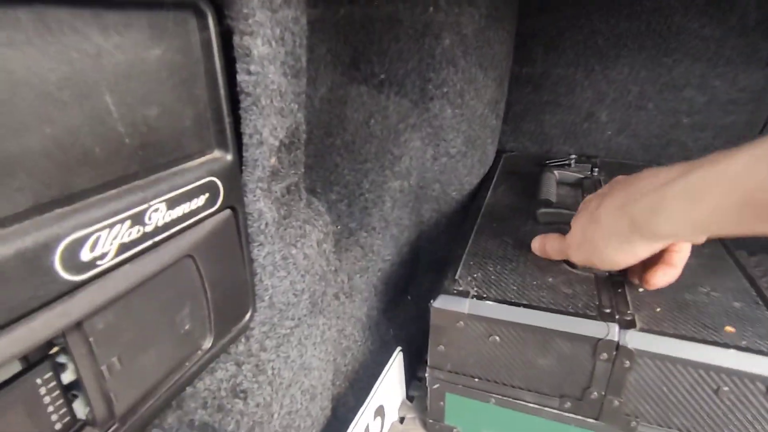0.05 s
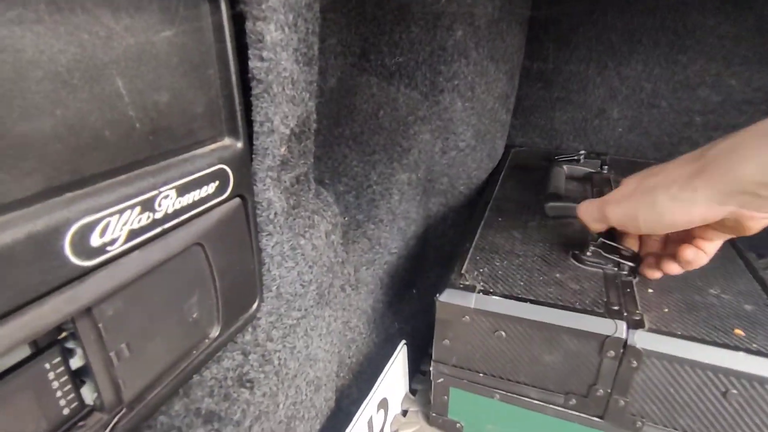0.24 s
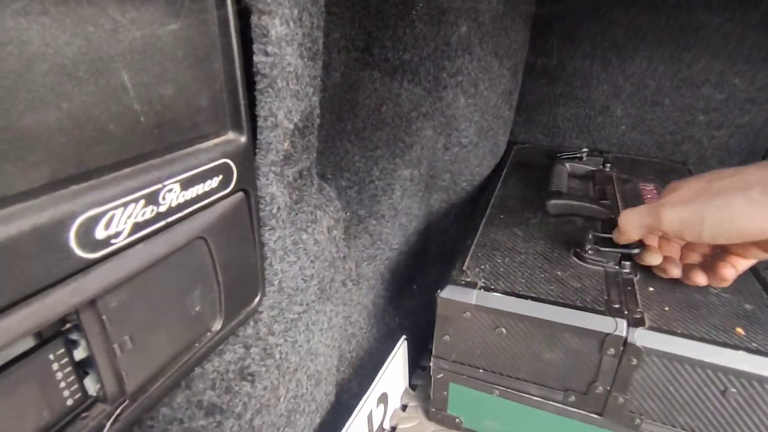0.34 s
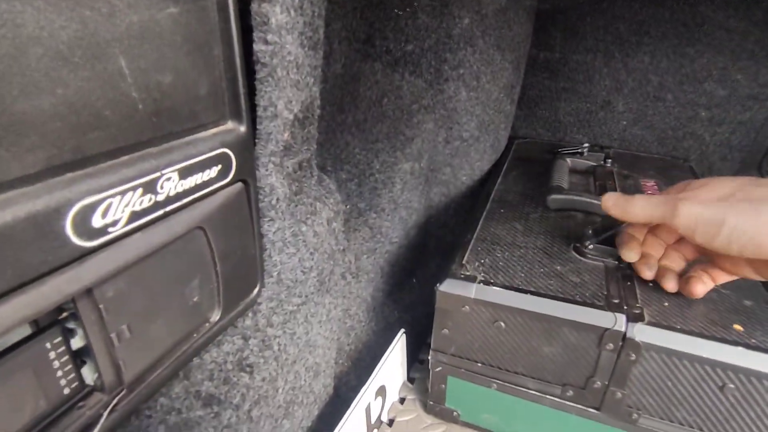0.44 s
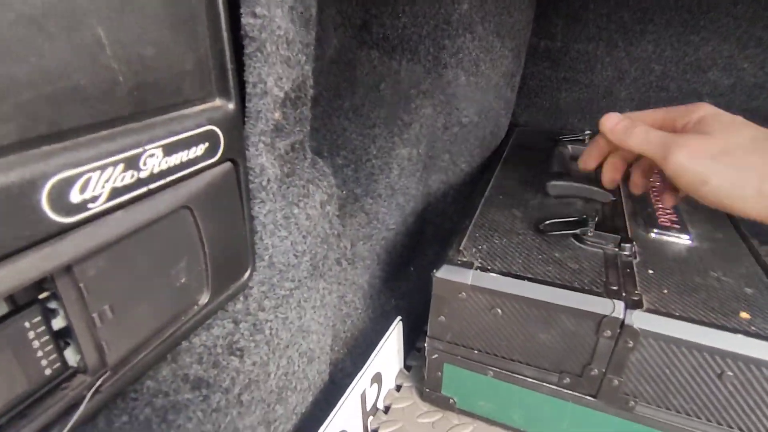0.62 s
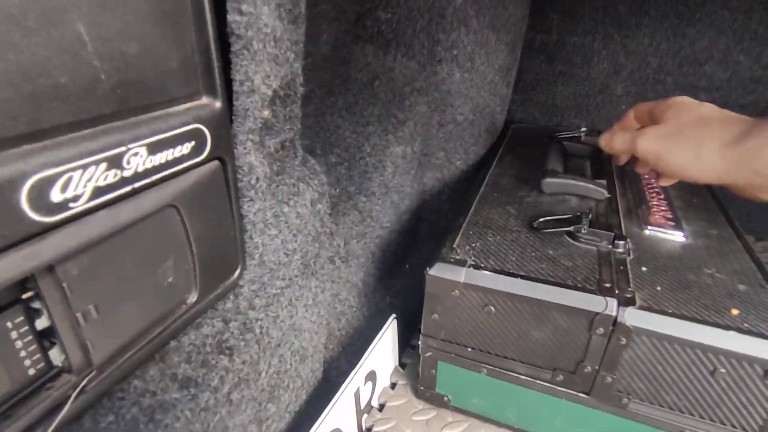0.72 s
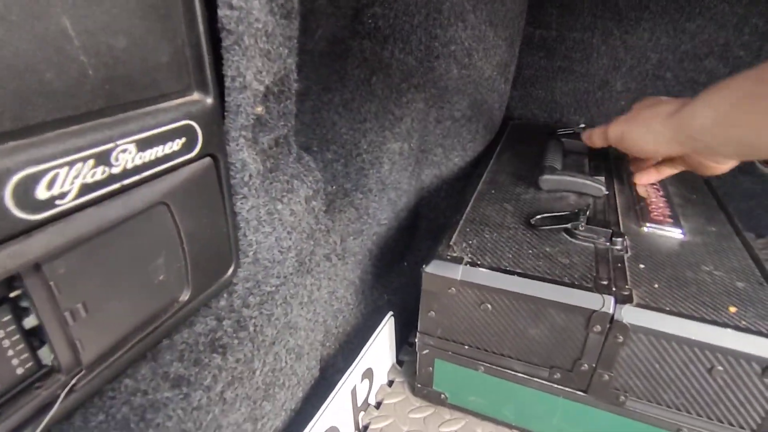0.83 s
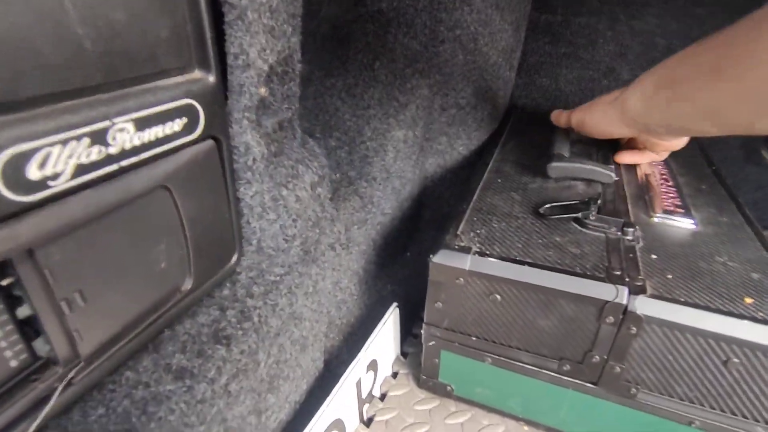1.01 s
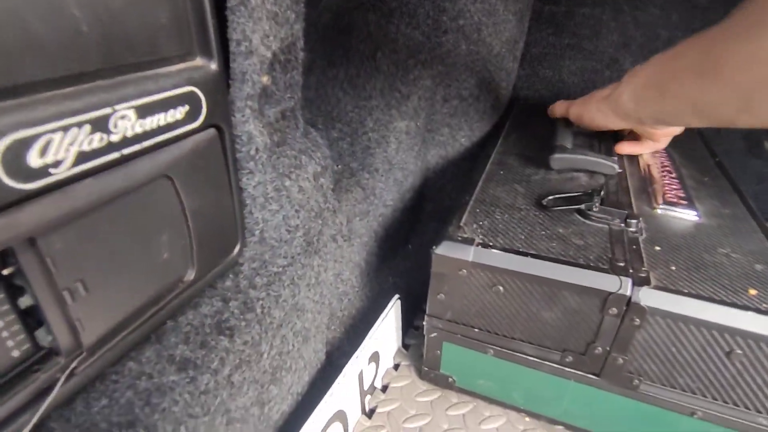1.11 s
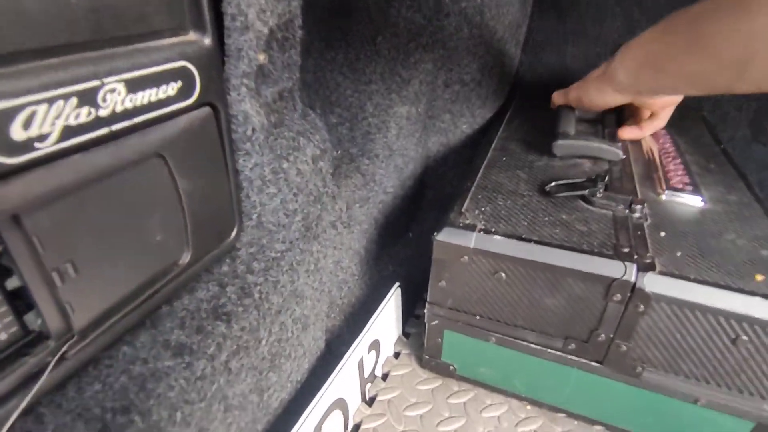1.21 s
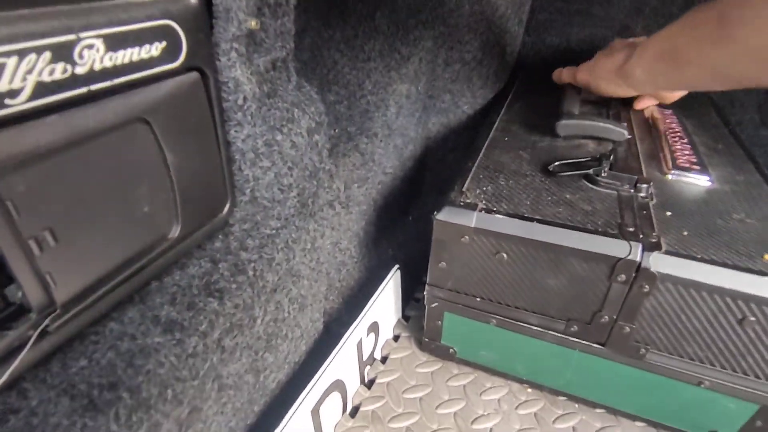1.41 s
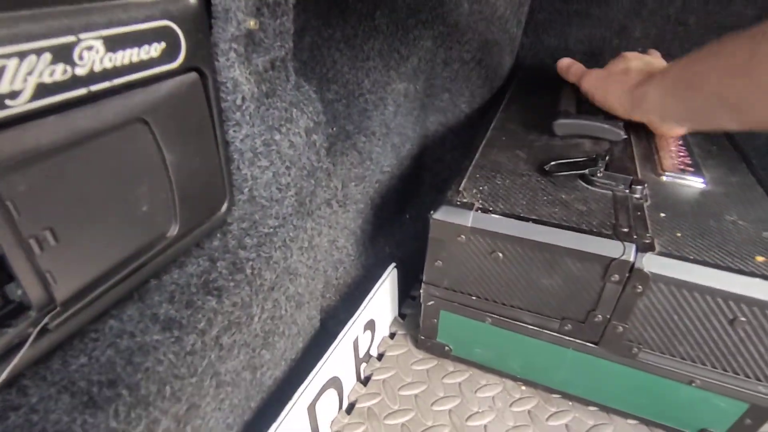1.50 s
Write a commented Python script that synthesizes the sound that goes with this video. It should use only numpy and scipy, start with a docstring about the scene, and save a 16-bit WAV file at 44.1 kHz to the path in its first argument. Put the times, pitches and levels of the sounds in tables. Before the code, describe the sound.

Metal latches on a hard case clack open and rattle as fingers handle the lid.

```python
"""Opening the latches of a tool case

A hand flips open two steel latches on a hard tool case in a carpeted car boot. Each latch snaps
and its loop rattles: every hit rings the steel, clacks the lever and makes the case's panels thud.
Between the snaps, fingers tap, slide and faintly squeak on the lid.
A low hum and faint outdoor air lie beneath, with one faint airy chirp."""
import sys
import numpy as np
from scipy import signal
from scipy.fft import rfft, irfft, next_fast_len
from scipy.io import wavfile
from scipy.ndimage import map_coordinates

SR = 44100
rng = np.random.default_rng(int(sys.argv[2]) if len(sys.argv) > 2 else 0)


def store_wav(level_fs):
    """Save 16-bit WAV to argv[1]."""
    pcm = np.round(np.clip(np.atleast_2d(level_fs), -1, 1) * 32767)
    wavfile.write(sys.argv[1], SR, pcm.T.astype(np.int16))


N = 68355
BLOW_N = SR // 3  # samples in the sound of one hit
CLACK_T60 = 0.048  # a "t60" is the seconds a sound takes to fade by 60 dB

# The tone of a mid-pitched clack. Each row: frequency in Hz, relative level in dB.
CLACK_TONE = [(150, -22.5), (450, -3.5), (750, 2), (1200, -3), (1900, -5), (4800, -22.5), (15000, -51)]
# The tone of steel's bright crack. Each row: frequency in Hz, relative level in dB.
CRACK_TONE = [(600, -34), (2000, -10.5), (4100, 3), (6300, 1.5), (7300, -3), (8400, 1), (9500, -1.5),
              (12000, 1), (15500, -5.5), (16500, -23)]
# How alike left and right sound. Each row: frequency in Hz, likeness from 0 (unrelated) to 1 (same).
STEREO_LIKENESS = [(60, 0.91), (290, 0.91), (640, 0.69), (1400, 0)]


def latches():
    """Each hit knocks one spot, shakes the case's panels, clacks the lever and rings the steel."""
    # Latch parts hitting the case. Each row: start in seconds, rise time in seconds,
    # knock pitch in Hz, then the levels of knock, panels, lever and steel in dB.
    hits = [(0.2401, 0.001, 387, -17, -21, -21.5, -17.5), (0.247, 0.0018, 445, -23, -19, -14.5, -21),
            (0.2588, 0.0006, 208, -23, -29, -37, -33), (0.3016, 0.0011, 160, -37, -28, -63, -38.5),
            (0.3212, 0.0022, 199.6, -1, -17, -20.5, -43), (0.3264, 0.0012, 213, -16, -21, -21.5, -32),
            (0.3333, 0.0036, 630, -32, -25, -21.5, -20.5), (.364, 0.00077, 227, -14.5, -23.5, -25.5, -23.5),
            (0.378, 0.0036, 5620, -34, -26, -29.5, -30.5), (0.534, 0.00088, 150, -47, -77, -70, -48),
            (0.569, 0.0015, 688, -16.5, -35.5, -28.5, -34), (0.5738, 0.0011, 229, -16.5, -30, -29, -28.5),
            (0.5974, 0.0025, 248, -30, -59, -40, -34.5), (0.637, 0.00006, 730, -10, -18.5, -13, -24.5),
            (.660, 0.0019, 163, -31, -33, -37.5, -41), (1.0888, 0.00023, 334, -18.5, -29.5, -24.5, -35.5),
            (1.0967, 0.00031, 274, -21, -32.5, -35, -38), (1.5154, 0.00084, 3700, -49, -44, -42.5, -50)]
    # The notes the steel rings at. Each row: pitch in Hz, relative level in dB, t60 in seconds.
    steel_notes = [(2690, -5.5, 0.093), (4280, 1.5, 0.054), (5900, -1.5, 0.063), (6600, -3, 0.06),
                   (8590, 0, 0.037), (10550, 3.5, 0.045), (11890, 5, 0.048), (12600, 3, 0.044)]
    # The notes the lever rings at. Each row: pitch in Hz, relative level in dB, t60 in seconds.
    lever_notes = [(1303, 6, 0.024), (1955, -15, 0.027), (2419, 0, 0.053)]
    out = np.zeros((2, N))
    for start, rise, knock_hz, knock_db, panel_db, lever_db, steel_db in hits:
        steel = ring(steel_notes, rise, detune=0.015)
        steel += amp(1.5) * burst(CRACK_TONE, rise, t60=0.048)
        lever = amp(-8.5) * ring(lever_notes, rise, detune=0.015)
        lever += burst(CLACK_TONE, rise, CLACK_T60)
        case = amp(knock_db) * knock(knock_hz) + amp(panel_db) * panels(rise)
        add(out, start, case + amp(lever_db) * lever + amp(steel_db) * steel)
        lead_in = amp(steel_db) * scrape(rise)
        add(out, start - lead_in.shape[1] / SR, lead_in)
    low_cut = signal.butter(3, 82, "high", fs=SR, output="sos")  # the hits carry little below 82 Hz
    return signal.sosfilt(low_cut, out)


def knock(hz, t60=0.04, rise=0.0022):
    """The struck spot rings briefly at its own pitch."""
    t = np.arange(BLOW_N) / SR
    return np.sqrt(2) * np.sin(2 * np.pi * hz * t) * amp(-60 * t / t60) * (1 - np.exp(-t / rise))


def panels(rise):
    """The case's walls answer a hit with low ringing and a dull thud."""
    # The notes the walls ring at. Each row: pitch in Hz, relative level in dB, t60 in seconds.
    panel_notes = [(150.3, -8.5, 0.18), (199.8, -4, 0.096), (250, 1, 0.088), (318, -19, 0.17),
                   (409.2, -3, 0.086), (546, -7.5, 0.066), (651, -14, 0.067), (718, -11, 0.057),
                   (968, -13, 0.067), (1102, -20, 0.12)]
    # The tone of the thud. Each row: frequency in Hz, relative level in dB.
    thud_tone = [(60, -44), (160, -8.5), (260, 2.5), (420, -11), (650, -0.5), (1200, -22.5), (3000, -43)]
    ringing = amp(4.5) * ring(panel_notes, rise, detune=0.005)
    return ringing + amp(1) * burst(thud_tone, rise, t60=0.028)


def scrape(rise):
    """Steel slides ever harder in the last 20 milliseconds before it lands."""
    seconds_left = np.arange(SR // 50)[::-1] / SR
    swell = np.exp(-seconds_left / (1.6 * rise))
    return amp(-14) * swell * noise(CRACK_TONE, len(seconds_left))


def finger_taps(rise=0.001):
    """Soft taps shake the panels and leave the steel still."""
    # Fingertips landing on the lid. Each row: start in seconds, panel level in dB, clack level in dB.
    taps = [(0.015, -38, -49), (.067, -66, -40), (0.505, -38, -46), (.862, -47.5, -79), (1.051, -45.5, -52),
            (1.291, -45, -66), (1.404, -44, -78), (1.468, -50, -51.5)]
    out = np.zeros((2, N))
    for start, panel_db, clack_db in taps:
        add(out, start, amp(panel_db) * panels(rise))
        add(out, start, amp(clack_db) * burst(CLACK_TONE, rise, CLACK_T60))
    return out


def rubbing():
    """Skin hisses over the textured lid while the case shifts and murmurs under the hand."""
    # The loudness of the sliding skin. Each row: time in seconds, level in dB.
    hiss_levels = [(0, -59.5), (.045, -52), (.12, -49.5), (.155, -61), (.19, -50.5), (.23, -62), (.29, -44),
                   (.42, -51.5), (.7, -71), (.92, -64.5), (1.01, -53.5), (1.07, -55.5), (1.2, -65.5),
                   (1.29, -57), (1.335, -47), (1.41, -51), (1.455, -72.5), (1.55, -55.5)]
    # The loudness of the shifting case. Each row: time in seconds, level in dB.
    murmur_levels = [(0, -51), (.225, -45), (.27, -34.5), (.3, -31), (.39, -37.5), (.48, -49.5),
                     (.63, -37.5), (.72, -55), (.98, -54), (1.1, -46.5), (1.2, -51.5), (1.55, -52.5)]
    # The tone of the skin's hiss. Each row: frequency in Hz, relative level in dB.
    skin_tone = [(900, -1), (1500, -8.5), (3200, -2.5), (6100, -10), (8600, -5.5), (12600, -3),
                 (15500, -17)]
    # The tone of the case's murmur. Each row: frequency in Hz, relative level in dB.
    lid_tone = [(60, -12.5), (145, 0), (250, -3), (420, -4), (620, -8), (900, -16), (1400, -15),
                (2500, -29), (15000, -50)]
    grip_db = wobble(150)
    hiss = amp(curve(hiss_levels) + grip_db) * noise(skin_tone, N)
    murmur = amp(curve(murmur_levels) + grip_db) * noise(lid_tone, N)
    return hiss + murmur


def squeaks(width=0.051):
    """A dragging fingertip catches and sings in a narrow band of noise; width is a share of its pitch."""
    # Fingertips catching on the lid. Each row: start and end in seconds, pitch in Hz, level in dB.
    catches = [(1.143, 1.334, 610, -59), (1.305, 1.378, 3300, -66)]
    t, out = np.arange(N) / SR, np.zeros(N)
    for start, end, hz, db in catches:
        progress = np.clip((t - start) / (end - start), 0, 1)
        swell = np.sqrt(np.abs(np.sin(np.pi * progress)))
        band = filtered(rng.standard_normal(N), lambda f: 1 / (1 + (2 * (f / hz - 1) / width) ** 2))
        out += amp(db) * swell * unit(band)
    return out


def hum(hz=68.93, db=-47):
    """One low tone whose level wavers slightly."""
    level = amp(db + 0.45 * wobble(6.4))
    return np.sqrt(2) * level * np.sin(2 * np.pi * hz * np.arange(N) / SR)


def chirp():
    """A faint high chirp; a very fast random shake of its pitch makes it airy."""
    # The chirp's path. Each row: time in seconds, pitch in Hz, level in dB.
    path = [(.735, 4460, -85), (.748, 5240, -71), (.775, 6000, -72), (.787, 4400, -62), (.803, 5100, -60),
            (.82, 4480, -60.5)]
    t = np.arange(N) / SR
    pitch = curve(path) * (1 + 0.1 * wobble(3000))
    sounding = (t > path[0][0]) & (t < path[-1][0])
    return amp(curve(path, column=2)) * np.sin(2 * np.pi * np.cumsum(pitch) / SR) * sounding


def outdoor_air():
    """A steady, faint rumble with a trace of hiss."""
    # The tone of the air. Each row: frequency in Hz, relative level in dB.
    air_tone = [(25, -77), (80, -7.5), (135, -6), (420, -45), (950, -43), (2500, -33.5), (4600, -30.5),
                (7100, -48), (15500, -51)]
    return amp(-58.5) * noise(air_tone, N)


def ring(notes, rise, detune, scatter_db=5.5):
    """A struck part rings at its own notes; each hit varies their levels and (by detune) their pitches."""
    t = np.arange(BLOW_N) / SR
    hz, db, t60 = np.transpose(notes)
    level_shift, pitch_shift, side = rng.standard_normal((3, len(hz)))
    gain = amp(db + scatter_db * level_shift) * (-1) ** np.arange(len(hz))
    fade = (gain / np.linalg.norm(gain))[:, None] * amp(-60 * t / t60[:, None])
    phase = 2 * np.pi * (hz * (1 + detune * pitch_shift))[:, None] * t
    offset = (np.sign(side) * stereo_angle(hz))[:, None]  # high notes differ between the ears
    ears = np.array([(fade * np.sin(phase + ear * offset)).sum(0) for ear in (-1, 1)])
    return np.sqrt(2) * ears * (1 - np.exp(-t / rise))


def burst(tone, rise, t60):
    """The noisy part of a hit: one direct push, then dense vibration scattered round the boot."""
    t = np.arange(BLOW_N) / SR
    boot_tail = amp(-9 - 60 * t / 0.075)  # the boot's own short ring
    envelope = (amp(-60 * t / t60) + boot_tail) * (1 - np.exp(-t / rise))
    scattered = unit(envelope * hollowed(noise(tone, BLOW_N)))
    pulse = quickest_pulse(amp(along(tone, np.fft.rfftfreq(BLOW_N, 1 / SR))))
    push = np.interp(t - 0.0003, t, unit(pulse), left=0)  # delayed by 0.3 milliseconds
    push_gain = amp(-7) / (1 + (rise / 0.0013) ** 2)  # weaker for a slower hit
    return unit(scattered - push_gain * push) * np.sqrt(np.mean(envelope ** 2))


def hollowed(x, depth_db=5, step_hz=300):
    """Each hit favours its own clusters of high notes and leaves hollows between them."""
    heights = rng.standard_normal(SR // step_hz)

    def gain(hz):
        bumps = np.minimum(map_coordinates(heights, [hz / step_hz]), 1)
        return amp(depth_db * np.clip(hz / 3000, 0, 1) * bumps)  # full depth from 3000 Hz up
    return filtered(x, gain)


def quickest_pulse(gain):
    """The most front-loaded pulse that has these gains across frequency (minimum phase)."""
    cepstrum = irfft(np.log(gain + 1e-9))
    cepstrum[1:BLOW_N // 2] *= 2
    cepstrum[BLOW_N // 2:] = 0
    return irfft(np.exp(rfft(cepstrum)))


def noise(tone, size):
    """Stereo noise of strength 1 with the given tone, nearly the same in both ears in the bass."""
    def gains(hz):
        angle = stereo_angle(hz)
        return amp(along(tone, hz)) * [np.cos(angle), np.sin(angle)]
    mid, side = filtered(rng.standard_normal((2, size)), gains)
    return unit(np.array([mid + side, mid - side]))


def stereo_angle(hz):
    """How far left and right part at this frequency, as an angle; 0 means not at all."""
    return np.arccos(np.clip(along(STEREO_LIKENESS, hz), -1, 1)) / 2


def filtered(x, response):
    """Scale each frequency in x by the gain response(hz)."""
    size = x.shape[-1]
    padded = next_fast_len(size + 8192)
    return irfft(rfft(x, padded) * response(np.fft.rfftfreq(padded, 1 / SR)), padded)[..., :size]


def wobble(rate):
    """A smooth random curve through rate points a second."""
    return map_coordinates(rng.standard_normal(N // 8), [np.arange(N) * rate / SR], mode="mirror")


def curve(rows, column=1):
    """Join the points of a time table with straight lines, giving one value per sample."""
    rows = np.array(rows)
    return np.interp(np.arange(N) / SR, rows[:, 0], rows[:, column])


def along(rows, hz):
    """Read a frequency table at hz, blending between rows on a log scale."""
    row_hz, values = np.transpose(rows)
    return np.interp(np.log(hz + 1), np.log(row_hz + 1), values)


def add(out, start, x):
    """Mix x into out, beginning at start seconds."""
    i = max(round(start * SR), 0)
    out[:, i:i + x.shape[1]] += x[:, :N - i]


def amp(db):
    """Turn decibels into a gain."""
    return 10 ** (np.asarray(db) / 20)


def unit(x):
    """Scale x to an average strength (rms) of 1."""
    return x / np.sqrt(np.mean(x ** 2) + 1e-20)


def scene():
    """The latches, the hand and the background together, in stereo."""
    return latches() + finger_taps() + rubbing() + squeaks() + hum() + chirp() + outdoor_air()


def record(dry, top_hz=16300):
    """The left microphone hears more of the highest treble; both cut off steeply above top_hz."""
    # The microphones' balance. Each row: frequency in Hz, left level minus right level in dB.
    balance = [(1500, 0.5), (4500, -1.1), (10500, -1.5), (13000, 11)]
    split = np.array([[0.5], [-0.5]])
    return filtered(dry, lambda hz: amp(along(balance, hz) * split) / (1 + (hz / top_hz) ** 120))


dry = scene()
out = record(dry)
store_wav(out)
```